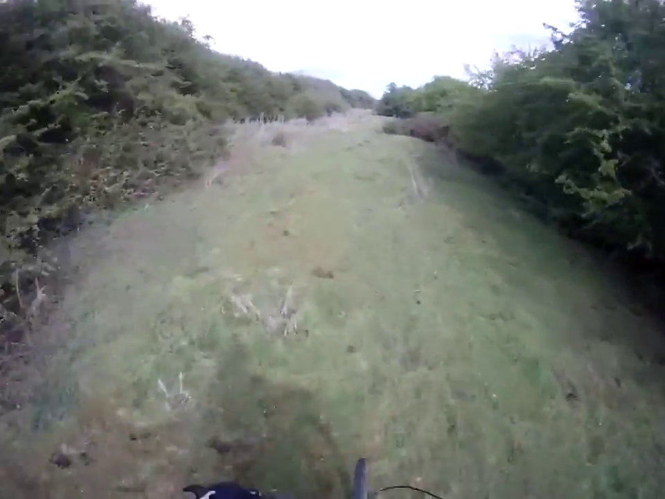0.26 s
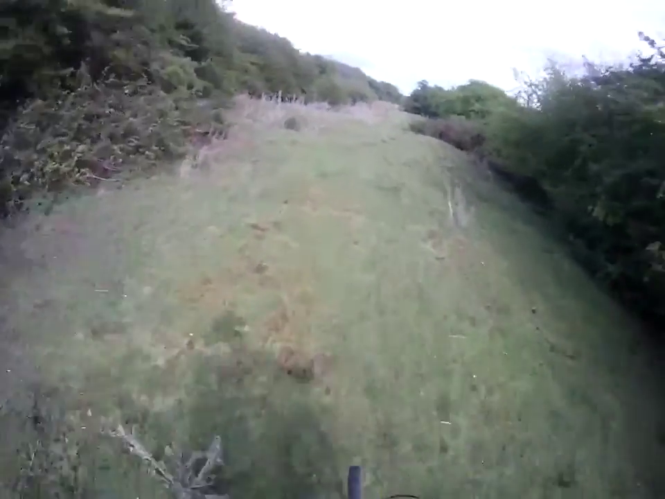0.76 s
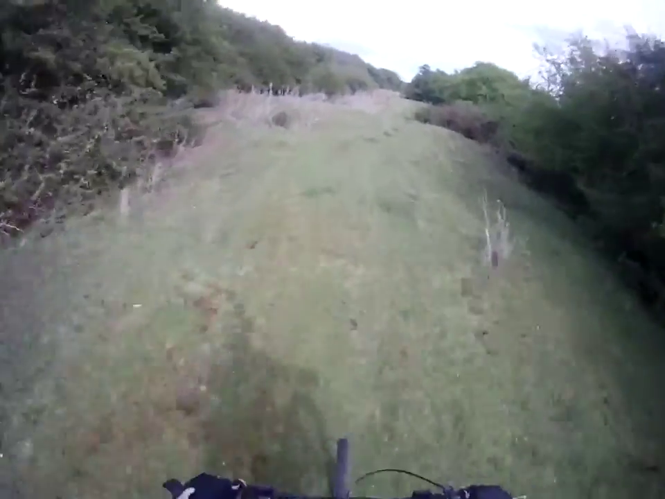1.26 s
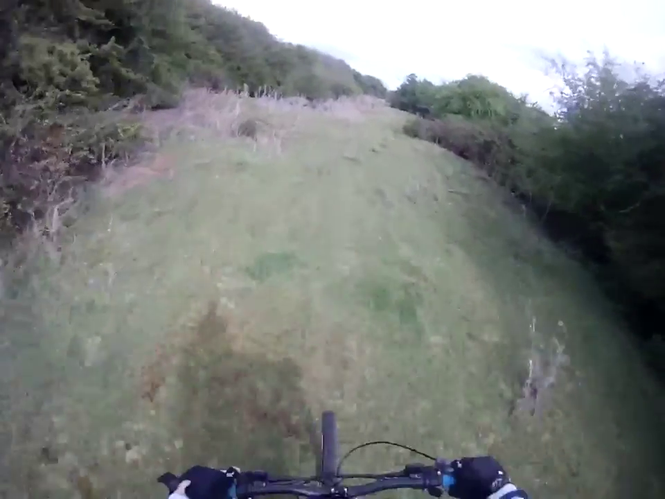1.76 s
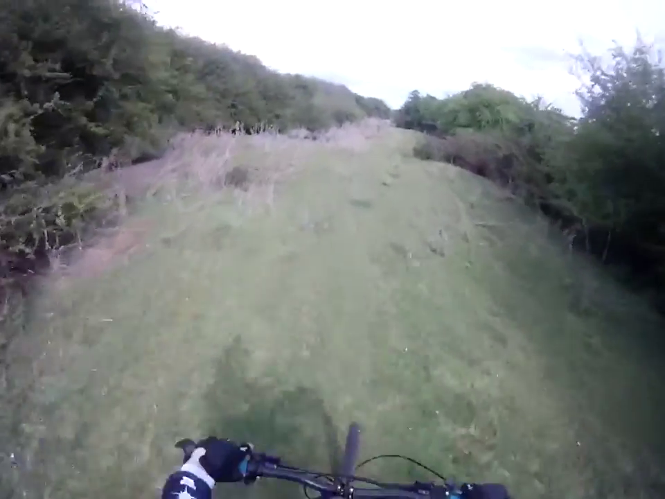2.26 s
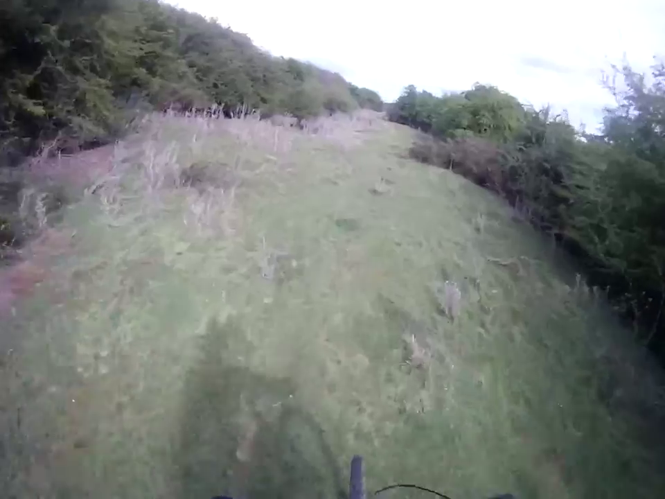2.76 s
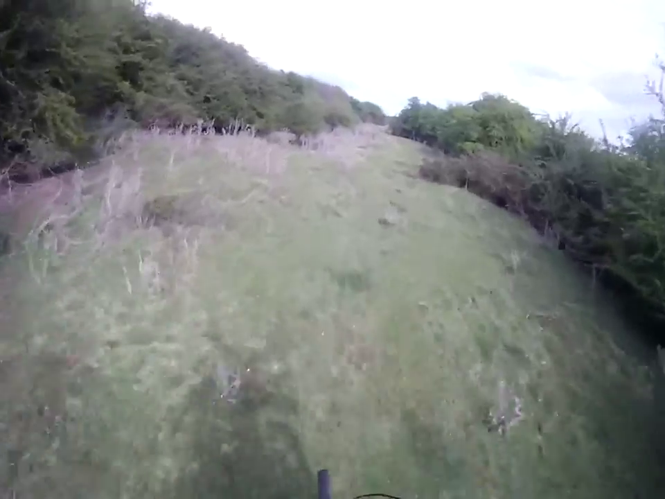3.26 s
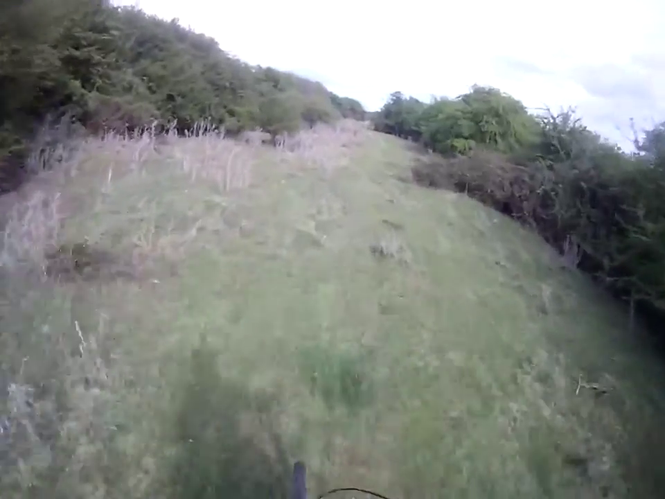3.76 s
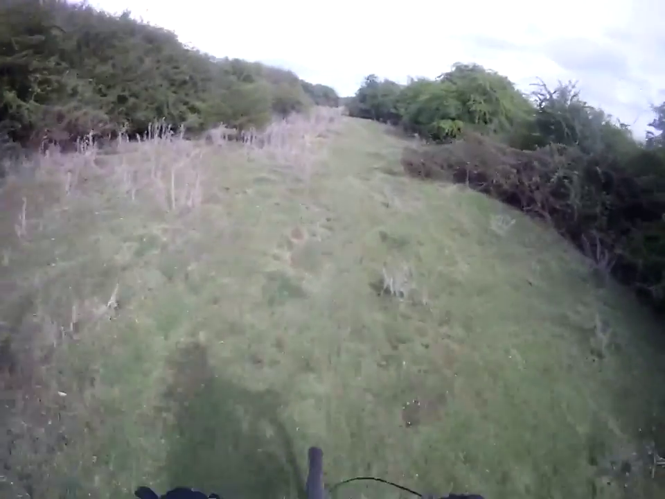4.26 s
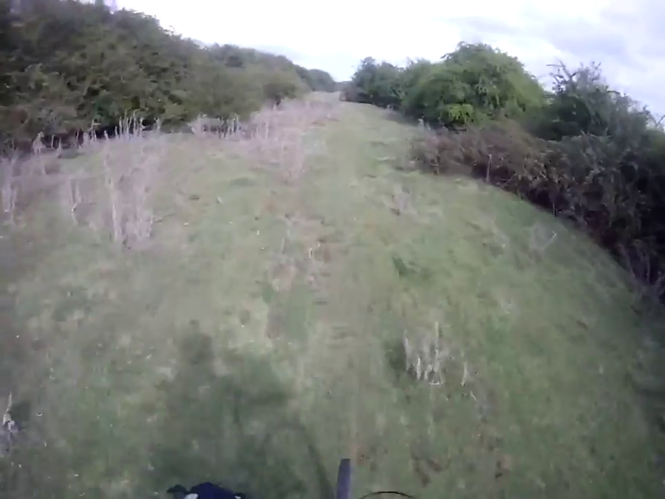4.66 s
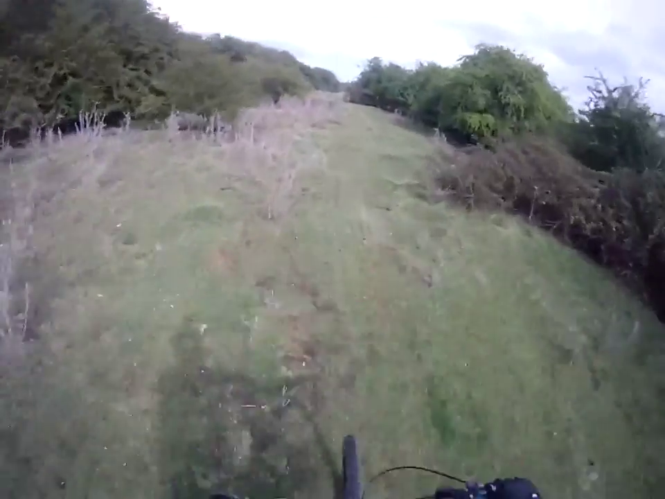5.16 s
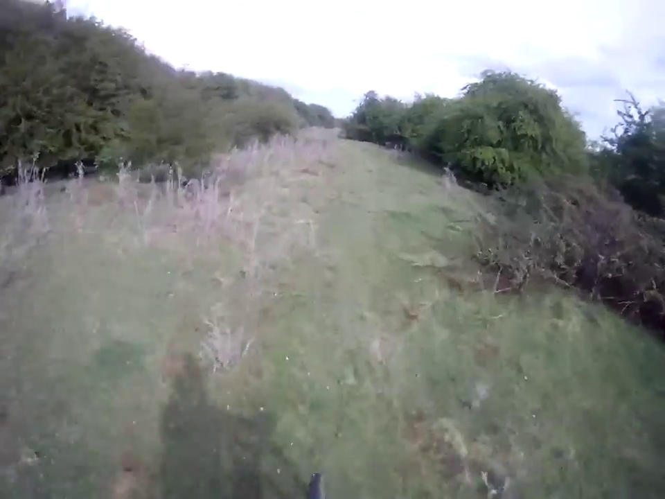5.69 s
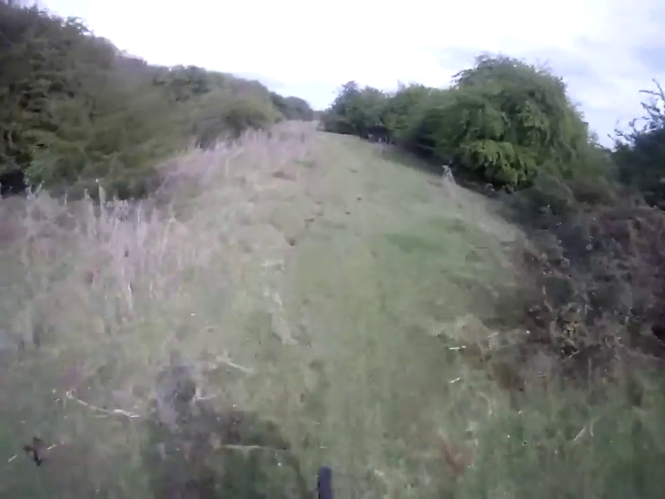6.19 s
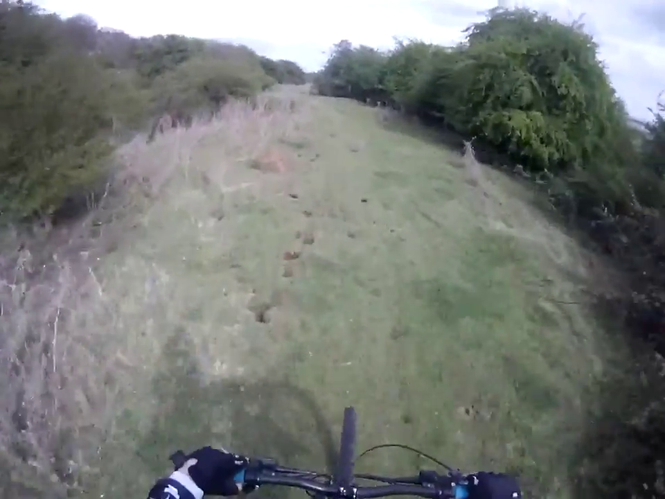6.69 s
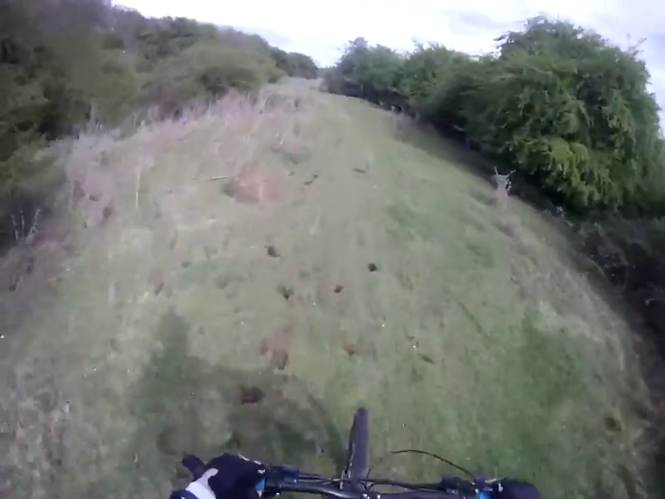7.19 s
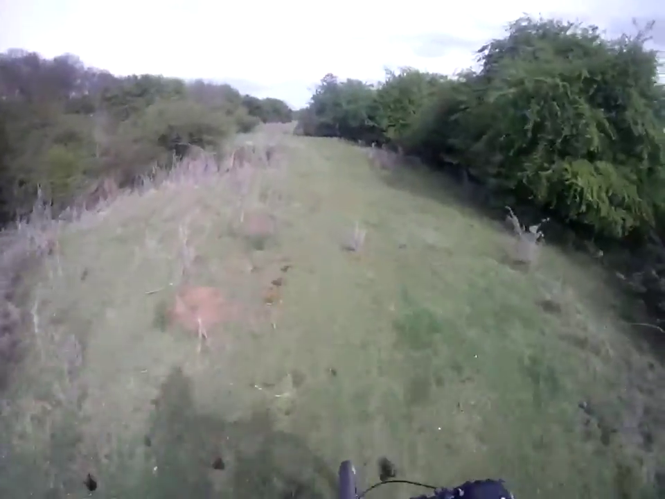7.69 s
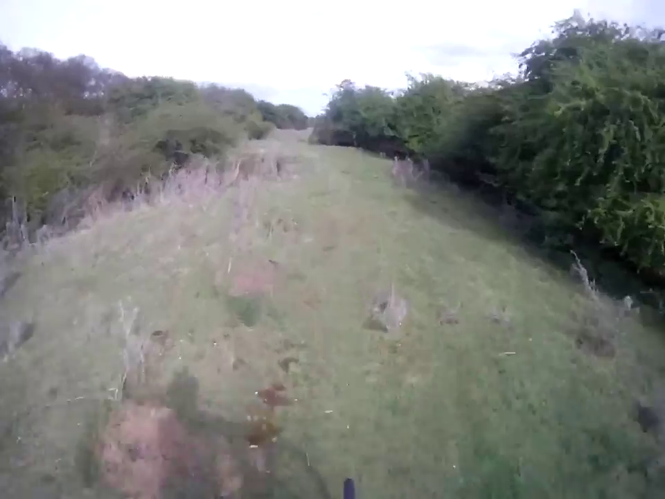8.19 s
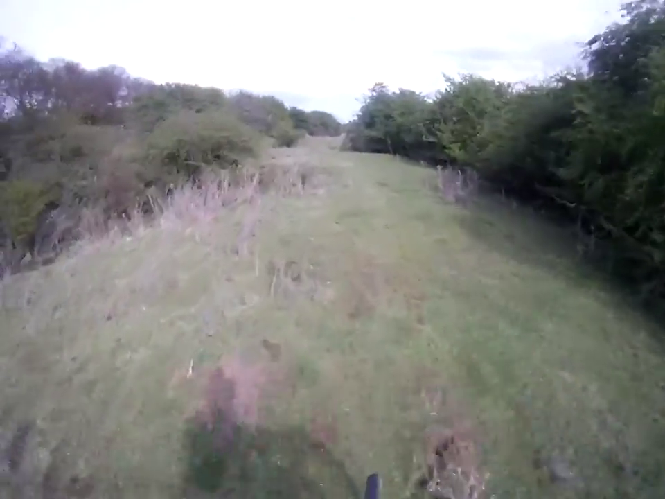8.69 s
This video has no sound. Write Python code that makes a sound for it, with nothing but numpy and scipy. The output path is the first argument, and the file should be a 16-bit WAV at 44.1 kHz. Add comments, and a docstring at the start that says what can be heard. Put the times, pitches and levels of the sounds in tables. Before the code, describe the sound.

A mountain bike rolls over bumpy grass by a hedge, heard close through a coarse, gritty body-worn camera microphone. Low, lumpy wind, soft tyre rumble and brushing grass continue throughout, with light loose ticking. A thump and hard clack with a frame knock come at 0.8-0.9 s, then a slap at 1.2 and the sharpest metallic crack at 1.4-1.5. More rattles cluster around 2.0-2.1, then it eases, with small clicks near 2.7-3.0. A faint rising bird whistle sounds at 3.5. Clacks and a thump hit at 4.2, chain slaps at 4.5 and 4.9-5.5, with a second whistle at 5.4. Wind swells around 5.6; light clatter follows at 6.0 and 6.4. The bird whistles again at 6.7 and, more clearly, 7.8. A knock at 7.3, a deep thump at 7.7, and lighter rattles at 8.2 and 8.7 lead to the end at about 9 s, still rolling.

```python
"""On bumpy grass beside a hedge, a mountain bike rolls along, heard from a small camera worn by the rider.
Wind is low, lumpy noise; the tyres rumble and the grass swishes as shaped noise mixed with random impulses.
The chain, fittings and frame are struck and ring with short, fading tones; thumps and pings are single notes.
A small bird gives four rising whistles, which scatter from the hedge.
The camera samples coarsely and holds each value, which adds a gritty treble."""
import sys
import numpy as np
from scipy import signal
from scipy.fft import rfft, irfft
from scipy.io import wavfile

SR = 44100
rng = np.random.default_rng(int(sys.argv[2]) if len(sys.argv) > 2 else 0)


def put_to_file(sound):
    """Save the sound as 16-bit audio at rate SR, in the file named by the first command-line argument."""
    columns = np.atleast_2d(sound).T  # one column per channel
    safe = np.clip(columns, -1, 1)
    whole_steps = np.round(safe * 32767)
    wavfile.write(sys.argv[1], SR, whole_steps.astype(np.int16))


N = 394254
TIME = np.arange(N) / SR  # s

# Levels in the tables are starting values: the settings and functions below may add to them.
# Tone balance of the wind, the tyres on soft ground and the brushed grass: (f/Hz, level per Hz/dB)
WIND_SPECTRUM = [(8, -2.5), (20, -6.5), (35, -3), (60, -2.5), (85, -3.5), (150, -11), (300, -22.5),
                 (800, -47)]
TYRE_SPECTRUM = [(50, -9), (120, -7), (200, 1.5), (260, -3), (330, -1), (470, -4), (590, -4.5),
                 (740, -15.5), (1000, -20.5), (2000, -27.5)]
GRASS_SPECTRUM = [(400, 0), (900, -2), (1050, -4.5), (1240, 2.5), (1500, -4), (2000, 1), (2450, 0.5),
                  (2900, 0.5), (3300, -3), (3800, -6), (4200, -18.5), (4900, -8), (5500, -14), (6000, -7.5)]

# How hard the ride buffets the microphone; the tyre rumble follows it: (t/s, level/dB)
BUFFETING_CURVE = [(0.0, -44.5), (0.79, -47), (0.94, -44.5), (2.99, -46.5), (3.14, -51.5), (4.01, -50.5),
                   (4.68, -43), (5.0, -47), (5.57, -40.5), (6.18, -42), (6.4, -47), (7.09, -49),
                   (7.47, -45.5), (8.17, -45.5), (8.61, -42), (8.94, -42.5)]
# Swish of the grass, higher where it is thicker: (t/s, level/dB)
SWISH_CURVE = [(0.0, -62), (1.07, -59.5), (1.67, -56), (3.48, -62.5), (5.25, -56), (5.98, -58.5),
               (6.62, -55), (7.02, -60.5), (7.59, -57.5), (8.02, -60.5), (8.46, -59.5), (8.94, -58.5)]
# Tufts of longer grass: (t/s, length/s)
GRASS_TUFTS = [(0.402, 0.12), (0.73, 0.11), (1.117, 0.11), (1.736, 0.084), (2.308, 0.043), (2.88, 0.08),
               (4.207, 0.044), (7.28, 0.037), (8.065, 0.13), (8.67, 0.037)]

# Tones heard when the chain and its cage, the cables and plastic fittings, and the frame are struck, as the
# camera's housing colours them: (f/Hz, level/dB, time to fade by 60 dB/s)
STEEL_MODES = [(1210, -10.5, 0.016), (1907, -2.5, 0.012), (2620, 0, 0.0064), (2813, -1.5, 0.014),
               (3656, 1.5, 0.0073), (4042, -4.5, 0.019), (4540, -2.5, 0.005), (5630, -15, 0.016)]
PLASTIC_MODES = [(900, -4, 0.0069), (1430, -5.5, 0.0091), (2070, -3, 0.011), (2490, 3.5, 0.0048),
                 (3140, -2, 0.0041)]
FRAME_MODES = [(573, 5, 0.036), (906, -12, 0.052), (1223, 0, 0.035), (1374, -15, 0.057), (1820, -14, 0.01)]

# Hard slaps of the chain, duller clacks of the fittings, and knocks of the frame:
# (t/s, level/dB, brightness/dB per octave)
CHAIN_SLAPS = [(.766, -31.5, 10.5), (1.179, -27.5, 3.5), (1.4363, -17.5, 4), (1.449, -25.5, 5),
               (1.4795, -28, 11), (1.825, -30, 2), (1.996, -33.5, -3), (2.0338, -22, 1), (2.083, -32, 6.5),
               (2.0946, -26.5, 13), (2.72, -38, -3), (2.951, -37.5, 8), (2.9929, -33, 12.5),
               (4.5206, -24, 0), (4.533, -25.5, -1.5), (4.932, -21, 2), (5.1157, -26, 3.5),
               (5.1661, -29.5, 7.5), (5.214, -31, 7.5), (5.4881, -26.5, 0.5), (5.496, -32, 10.5),
               (5.72, -31.5, 3.5), (5.988, -29, 7.5), (6.0355, -29.5, 7.5), (8.153, -32.5, 3),
               (8.198, -28.5, 8.5), (8.287, -39.5, 5.5), (8.692, -34.5, 6), (8.7295, -31, 10.5)]
FITTING_CLACKS = [(0.8829, -16.5, -2), (1.427, -28.5, -2), (1.685, -36.5, 2.5), (2.324, -34.5, -4.5),
                  (4.1604, -22.5, -1), (4.171, -27, 1), (4.1908, -26.5, 3.5), (6.3293, -35.5, 1),
                  (6.363, -33, -1.5), (6.43, -31.5, 7)]
FRAME_KNOCKS = [(0.8834, -18, -2), (1.510, -34, -5), (1.698, -32, -5.5), (1.759, -33.5, -13),
                (2.022, -29.5, -7), (2.113, -28, -8), (4.528, -28, -11), (5.118, -33, -11),
                (5.498, -33.5, -22), (5.990, -27.5, 27), (7.2899, -24, -3), (8.150, -38, -17),
                (8.758, -37.5, -6)]

# Low thumps from bumps and gusts of wind, and small metal parts that ring with one note:
# (t/s, level/dB, f/Hz, time to fade by 60 dB/s)
LOW_THUMPS = [(0.817, -25, 56.3, .1), (1.512, -24.5, 45, 0.075), (2.122, -25, 42.3, 0.16),
              (4.159, -22.5, 358, 0.032), (4.452, -29, 74.6, 0.15), (5.315, -31.5, 75, 0.14),
              (5.690, -34.5, 117, 0.096), (6.890, -31, 410, 0.026), (7.718, -22, 64, 0.16),
              (7.719, -31, 136, .09), (7.928, -29, 95, .16)]
METAL_PINGS = [(1.4495, -15.5, 3670, 0.013), (1.5585, -32.5, 2940, 0.04), (1.901, -30, 3470, 0.015)]

# Bird calls: (t/s, length/s, level/dB, pitch before the last flick f/Hz, bow)
# A bow of 1 climbs evenly; a larger one levels off early.
BIRD_CALLS = [(3.502, 0.11, -49.5, 3930, 4.1), (5.440, 0.11, -46, 4080, 2.1),
              (6.682, .123, -44.5, 4420, 1.2), (7.836, 0.13, -41.5, 3970, 1.8)]

# Each rolling layer against its curve, and the rise at the middle of a tuft, in dB
WIND_DB, SWISH_DB, RATTLE_DB, TUFT_DB = 2.0, 3.5, -7.5, 6.5
# Tyre level at the usual buffeting (dB), and its change in dB per dB of buffeting
RUMBLE_DB, USUAL_BUFFETING_DB, RUMBLE_FOLLOWS = -51, -45, 0.46

# Rough ground surrounds each blow; a lone blow at FULL_SHAKE_DB gives about 0.76 of a full shake
SHAKE_BUILD_S, SHAKE_SETTLE_S, FULL_SHAKE_DB = 0.034, 0.044, -23.5
# What a full shake adds to each layer, in dB
SHAKE_WIND_DB, SHAKE_TYRES_DB, SHAKE_SWISH_DB, SHAKE_RATTLE_DB = 2.5, 2, 2.5, 7

CRACK_HZ, CRACK_S = 3300, 0.000215  # pitch and half length of the first contact
# Glancing slaps are brighter and rebound later: delay at zero brightness, and brightness that doubles it
REBOUND_S, REBOUND_DOUBLES_DB = 0.0023, 7
REBOUND_DB, GLANCING_DB = -11.5, 0.6259  # rebound level, and its dB per dB of brightness
# Every chain slap also rings the frame: level against the slap (dB), and brightness (dB per octave)
CHAIN_TO_FRAME_DB, CHAIN_TO_FRAME_BRIGHT_DB = -18.5, -0.5

CALL_START_HZ, FLICK_HZ, FLICK_S = 3000, 520, 0.0091  # a low start and a quick upward flick at the end
# A call swells until this share of its length, then fades; start and end are against its peak
CALL_PEAK_AT, CALL_START_DB, CALL_END_DB = 0.74, -14, -3

CAMERA_RATE, EDGE_HZ = 12000, 15380  # coarse samples a second, and the upper limit of the sound in Hz


def gain_of(db):
    """Turns decibels into a multiplier for the wave."""
    return 10 ** (np.asarray(db) / 20)


def evened(x):
    """Scales a signal to an average strength (rms) of 1."""
    return x / np.sqrt(np.mean(x ** 2) + 1e-20)


def add(mix, s, sound):
    """Mixes a sound in at s seconds, cut off at the end of the mix."""
    part = mix[round(s * SR):][:len(sound)]
    part += sound[:len(part)]


def coloured(x, spectrum):
    """Filters x by a tone balance drawn over pitch, then sets its rms to 1."""
    hz, db = np.transpose(spectrum)
    bins = np.fft.rfftfreq(N, 1 / SR)
    level_db = np.interp(np.log(bins + 1), np.log(hz), db)
    return evened(irfft(rfft(x) * gain_of(level_db), N))


def wander(per_s):
    """Makes a smooth random curve of rms 1 that turns about per_s times a second."""
    bins = np.fft.rfftfreq(N, 1 / SR)
    slow = rfft(rng.standard_normal(N)) / (1 + (bins / per_s) ** 4)
    return evened(irfft(slow, N))


def grains(per_s, spread_db):
    """Makes impulses at random moments, of random sign and size, with a few much larger than most."""
    struck = rng.random(N) < per_s / SR
    sign = rng.choice([-1, 1], N)
    size_db = spread_db * np.minimum(rng.exponential(1, N), 4)
    return struck * sign * gain_of(size_db)


def ring(modes, bright_db, scatter_db, detune):
    """Rings one blow: fading tones, whose mix depends on the spot that is struck, at a peak of 1."""
    hz, db, t60 = np.transpose(modes)[:, :, None]
    t = np.arange(SR // 10) / SR
    size, shift = rng.standard_normal((2, len(hz), 1))
    sign = (-1) ** np.arange(len(hz))[:, None]
    level_db = db + bright_db * np.log2(hz / hz[0]) + scatter_db * size
    tones = np.sin(2 * np.pi * hz * (1 + detune * shift) * t)
    wave = (sign * gain_of(level_db - 60 * t / t60) * tones).sum(0)
    return wave / abs(wave).max()


def shake():
    """Tells how hard the bike shakes, 0 to 1: it builds up to each blow and settles after it."""
    times = np.arange(0, N / SR, 1 / 200)
    s, db, _ = np.transpose(CHAIN_SLAPS + FRAME_KNOCKS + FITTING_CLACKS)[:, :, None]
    near = np.exp(-np.maximum((s - times) / SHAKE_BUILD_S, (times - s) / SHAKE_SETTLE_S))
    strength = (gain_of(db - FULL_SHAKE_DB) * near).sum(0)
    return np.interp(TIME, times, np.tanh(strength))


def wind(level_db):
    """Wind pushes on the microphone in lumpy, low pressure swings."""
    lumps = gain_of(1.3 * wander(14))
    return gain_of(level_db) * evened(coloured(rng.standard_normal(N), WIND_SPECTRUM) * lumps)


def tyres(level_db):
    """Tyre knobs and tufts thud against soft ground: many impulses over steady noise."""
    thuds = evened(grains(900, spread_db=3.5)) + 0.91 * rng.standard_normal(N)
    uneven = gain_of(2.37 * wander(5.6))
    return gain_of(level_db) * coloured(thuds * uneven, TYRE_SPECTRUM)


def grass(level_db):
    """Blades brush and snap under the tread, in clumps, and louder through each tuft."""
    brush = coloured(rng.standard_normal(N) * gain_of(2.4 * wander(27)), GRASS_SPECTRUM)
    snaps = coloured(grains(300, spread_db=3) * gain_of(3.6 * wander(34)), GRASS_SPECTRUM)
    tuft_db = TUFT_DB * sum(np.exp(-(2 * (TIME - s) / length) ** 2) for s, length in GRASS_TUFTS)
    return gain_of(level_db + tuft_db) * evened(brush + 0.48 * snaps)


def rattle(level_db):
    """Six loose links and cables tick lightly at random, each with its own ring."""
    parts = [ring(STEEL_MODES, bright_db=3, scatter_db=3, detune=.035) for _ in range(6)]
    ticks = sum(signal.oaconvolve(grains(3.6, spread_db=3.5), part)[:N] for part in parts)
    return gain_of(level_db) * evened(ticks)


def slaps(rows, modes):
    """Each slap of a loose part cracks, rings, rebounds, and shivers on briefly."""
    out, t = np.zeros(N), np.arange(SR // 10) / SR
    contact = t - 2 * CRACK_S
    crack = np.exp(-(contact / CRACK_S) ** 2) * np.cos(2 * np.pi * CRACK_HZ * contact)
    for s, db, bright_db in rows:
        rebound_s = REBOUND_S * 2 ** (bright_db / REBOUND_DOUBLES_DB)
        rebound_db = db + REBOUND_DB + GLANCING_DB * bright_db
        slap, second = (ring(modes, bright_db, scatter_db=2.5, detune=.025) for _ in range(2))
        fading_noise = rng.standard_normal(len(t)) * gain_of(-60 * t / 0.038)
        shiver = signal.fftconvolve(slap, fading_noise)
        add(out, s, gain_of(db - 6.0) * crack)
        add(out, s, gain_of(db) * slap)
        add(out, s + rebound_s, gain_of(rebound_db) * second)
        add(out, s, gain_of(db - 9.0) * shiver / abs(shiver).max())
    return out


def frame():
    """The frame knocks hollowly on bumps; its thin tubes radiate little below their first mode."""
    out, t = np.zeros(N), np.arange(SR // 10) / SR
    from_chain = [(s, db + CHAIN_TO_FRAME_DB, CHAIN_TO_FRAME_BRIGHT_DB) for s, db, _ in CHAIN_SLAPS]
    soft_start = 1 - np.exp(-t / 0.0011)
    for s, db, bright_db in FRAME_KNOCKS + from_chain:
        knock = ring(FRAME_MODES, bright_db, scatter_db=1, detune=.005)
        add(out, s, gain_of(db + 4) * soft_start * knock)
    return signal.sosfilt(signal.butter(4, 470, "highpass", fs=SR, output="sos"), out)


def notes(rows, rise_s):
    """Damped single notes: a thump or a ping starts quickly and fades evenly in decibels."""
    out, t = np.zeros(N), np.arange(SR // 4) / SR
    soft_start = 1 - np.exp(-t / rise_s)
    for s, db, hz, t60 in rows:
        add(out, s, gain_of(db - 60 * t / t60) * np.sin(2 * np.pi * hz * t) * soft_start)
    return out


def whistle(length, peak_db, top_hz, bow):
    """One call: the pitch climbs and flicks up at the end, while the level swells and fades."""
    t = np.arange(0, length, 1 / SR)
    climb = 1 - np.maximum(1 - t / length, 0) ** bow
    flick = FLICK_HZ * np.exp((t - length) / FLICK_S)
    hz = CALL_START_HZ + (top_hz - CALL_START_HZ) * climb + flick
    db = peak_db + np.interp(t / length, [0, CALL_PEAK_AT, 1], [CALL_START_DB, 0, CALL_END_DB])
    tone = np.sin(2 * np.pi * np.cumsum(hz) / SR)
    return gain_of(db) * tone * signal.windows.tukey(len(t), .08)  # soft ends


def bird():
    """The bird whistles upward, and the hedge scatters each call into a short tail."""
    song, t = np.zeros(N), np.arange(SR // 2) / SR
    for s, *call in BIRD_CALLS:
        add(song, s, whistle(*call))
    leaves = rng.standard_normal(len(t)) * gain_of(-60 * t / 0.51)
    scattered = signal.fftconvolve(song, leaves / np.linalg.norm(leaves))[:N]
    return song + gain_of(-8.5) * scattered


def scene():
    """Adds everything at the one microphone; the rolling sounds swell where the bike is shaken."""
    buffet_db = np.interp(TIME, *np.transpose(BUFFETING_CURVE))
    swish_db = np.interp(TIME, *np.transpose(SWISH_CURVE))
    tyre_db = RUMBLE_DB + RUMBLE_FOLLOWS * (buffet_db - USUAL_BUFFETING_DB)
    shaken = shake()
    air = wind(buffet_db + WIND_DB + SHAKE_WIND_DB * shaken)
    rolling = tyres(tyre_db + SHAKE_TYRES_DB * shaken)
    rolling += grass(swish_db + SWISH_DB + SHAKE_SWISH_DB * shaken)
    rolling += rattle(swish_db + RATTLE_DB + SHAKE_RATTLE_DB * shaken)
    blows = slaps(CHAIN_SLAPS, STEEL_MODES) + slaps(FITTING_CLACKS, PLASTIC_MODES) + frame()
    single_notes = notes(LOW_THUMPS, rise_s=0.00093) + notes(METAL_PINGS, rise_s=0.0011)
    return (air + rolling + blows + single_notes + bird())[None]


def record(dry):
    """The camera samples slowly and holds each value, which mirrors the sound into the treble."""
    smooth = signal.oaconvolve(dry[0], signal.firwin(61, 5400, fs=SR), "same")
    coarse = signal.resample_poly(smooth, 4 * CAMERA_RATE, SR)[::4]  # keep every fourth value
    held = np.repeat(coarse, 4)
    steps = signal.resample_poly(held, SR, 4 * CAMERA_RATE)[:N]
    band_limit = signal.firwin(161, EDGE_HZ, window=("kaiser", 7), fs=SR)
    return signal.oaconvolve(steps, band_limit, "same")[None]


dry = scene()
out = record(dry)
put_to_file(out)
```